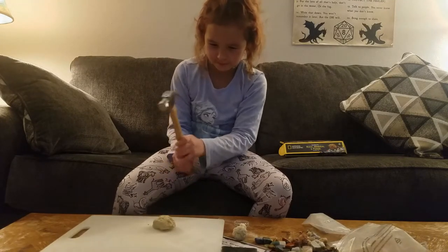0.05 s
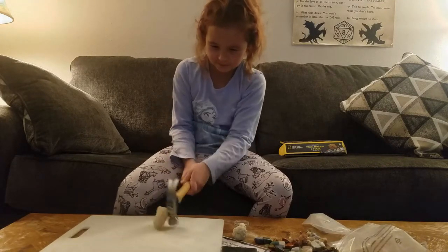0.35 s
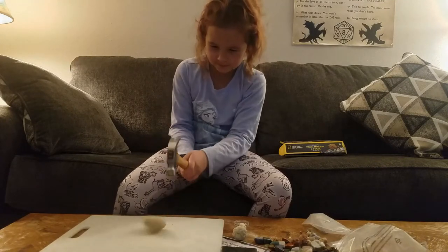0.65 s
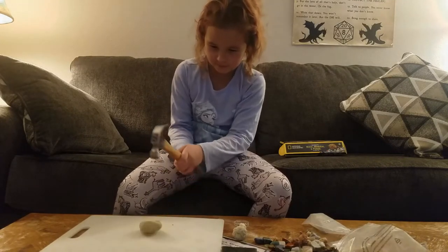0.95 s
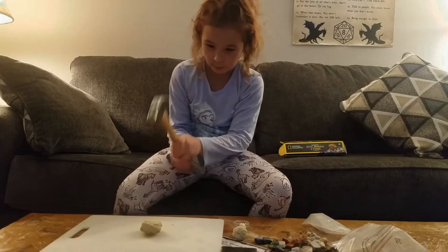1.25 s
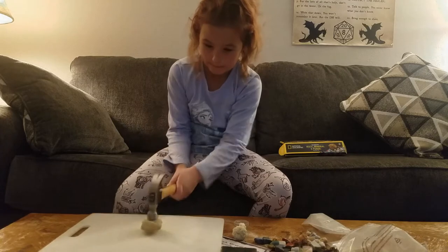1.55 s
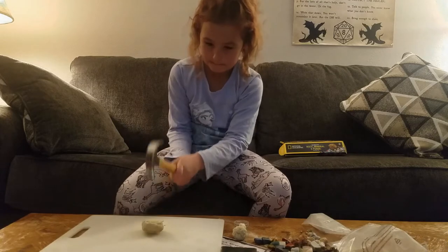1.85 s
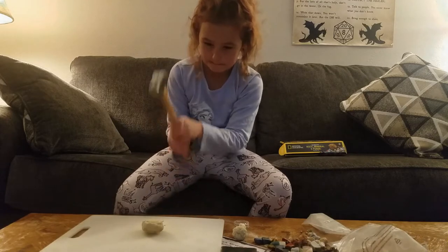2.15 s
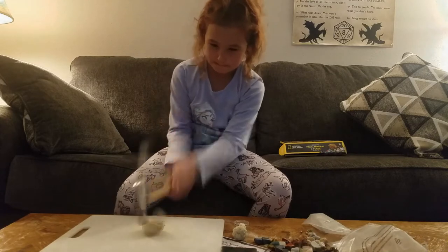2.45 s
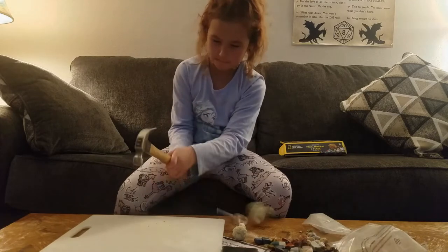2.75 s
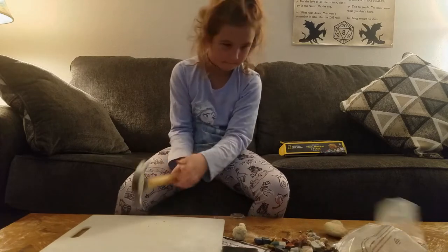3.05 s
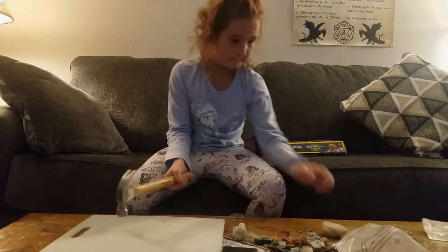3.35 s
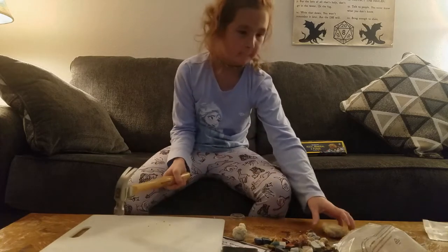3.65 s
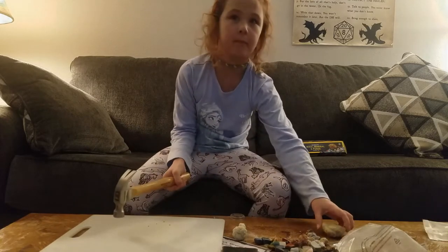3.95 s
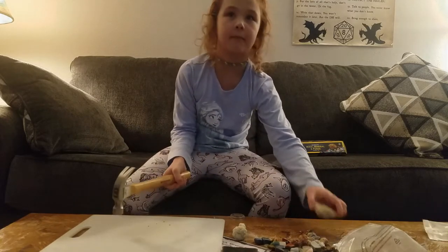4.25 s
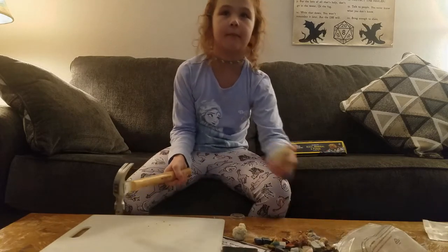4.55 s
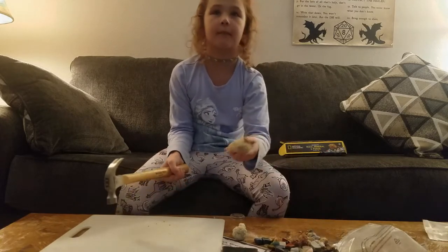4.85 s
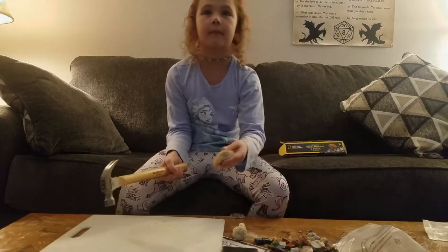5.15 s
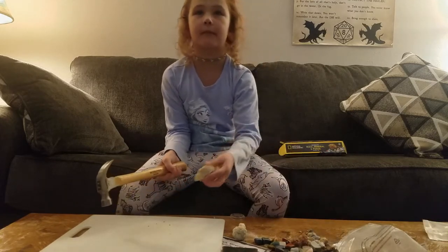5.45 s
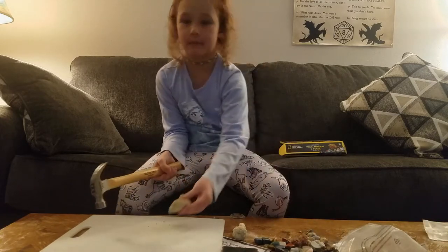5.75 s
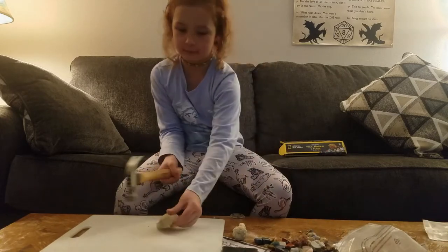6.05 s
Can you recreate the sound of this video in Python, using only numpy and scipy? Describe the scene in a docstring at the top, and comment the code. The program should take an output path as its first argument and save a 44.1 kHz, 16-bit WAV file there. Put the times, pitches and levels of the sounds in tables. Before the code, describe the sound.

A small hammer cracks against a stone on a plastic cutting board three times, and the stone tumbles across a wooden table.

```python
"""A sharp crack over a living room's hush: a small steel hammer strikes a geode, three times in all,
and stone and plastic cutting board ring on a wooden table. After the first blow the stone wobbles;
after the third it lands on the table, a chip pings, and the stone tumbles past a plastic bag and rolls
out. It is set back on the board. Gain control pulls the hush down after every loud blow."""
import sys
import numpy as np
from scipy import signal
from scipy.fft import rfft, irfft, next_fast_len
from scipy.io import wavfile
from scipy.ndimage import uniform_filter1d, minimum_filter1d

SR = 44100
rng = np.random.default_rng(int(sys.argv[2]) if len(sys.argv) > 2 else 0)


def dump_mix(stems):
    """Bounce the given channels to the path in sys.argv[1] as a 16-bit WAV at rate SR."""
    frames = np.atleast_2d(stems).T  # one column per channel
    limited = np.clip(frames, -1, 1)  # hard clip at full scale
    pcm = np.round(limited * 32767).astype(np.int16)
    wavfile.write(sys.argv[1], SR, pcm)


N = 273861
T = np.arange(SR * 6 // 10) / SR  # time axis of one hit, s


def amp(db):
    """Decibels to gain."""
    return 10 ** (np.asarray(db) / 20)


def unit(x):
    """x at rms 1."""
    return x / np.sqrt(np.mean(x ** 2) + 1e-20)


def along(points, hz):
    """Interpolate (freq_hz, value) points on a log axis."""
    freqs, values = np.transpose(points)
    return np.interp(np.log(hz + 1), np.log(freqs + 1), values)


def filtered(x, response):
    """Apply a frequency response to x."""
    size = next_fast_len(x.shape[-1] + 8192)
    return irfft(rfft(x, size) * response(np.fft.rfftfreq(size, 1 / SR)), size)[..., :x.shape[-1]]


def causal(gain):
    """Minimum-phase response with this gain: nothing sounds before the hit."""
    cepstrum = irfft(np.log(np.maximum(gain, 1e-6)))
    half = len(cepstrum) // 2
    return np.exp(rfft(np.r_[cepstrum[0], 2 * cepstrum[1:half], np.zeros(half)]))


def add(track, start_s, level_db, sound):
    """Mix a sound in; level_db is the rms of its first 30 ms."""
    start, head = round(start_s * SR), sound[:, :SR * 3 // 100]
    part = sound[:, :N - start]
    track[:, start:start + part.shape[1]] += part * amp(level_db) / np.sqrt(np.mean(head ** 2))


# left-right likeness of diffuse sound: freq_hz, coherence
COHERENCE = [(100, .82), (300, .7), (600, .5), (1000, 0), (2500, .05), (12000, 0)]
def diffuse(size):
    """Stereo noise from all directions: alike in the bass, unrelated in the treble."""
    angle = lambda hz: np.arccos(np.clip(along(COHERENCE, hz), -1, 1)) / 2
    split = lambda hz: np.array([np.cos(angle(hz)), np.sin(angle(hz))])
    mid, side = filtered(rng.standard_normal((2, size)), split)
    return np.array([mid + side, mid - side])


# room reverberation: freq_hz, t60_s
ROOM_DECAY = [(100, .3), (400, 0.35), (1500, 0.34), (5000, 0.35), (8000, .29), (15000, 0.19)]
def in_room(x, wet_db, hold_s):
    """Direct sound plus reflections that hold for hold_s, then die away."""
    hz, t, spectra = signal.stft(diffuse(len(T)), SR, nperseg=256)
    fade = amp(-60 * np.maximum(t - hold_s, 0) / along(ROOM_DECAY, hz)[:, None])
    tail = signal.istft(spectra * fade, SR, nperseg=256)[1][:, :len(T)] * (1 - np.exp(-T / 0.001))
    tail /= np.linalg.norm(tail[0])
    return x + amp(wet_db) * signal.fftconvolve(np.atleast_2d(x), tail, axes=1)[:, :len(T)]


def crunch(t60_s):
    """Countless close resonances dying together: a stereo burst of unit energy."""
    burst = diffuse(len(T)) * amp(-60 * T / t60_s)
    return burst / np.linalg.norm(burst[0])


def ring(modes):
    """Damped modes, struck at slightly new strengths each time; neighbours swing opposite ways."""
    hz, width_hz, db = np.transpose(modes)[:, :, None]
    sign = (-1) ** np.arange(len(modes))[:, None]
    strength = sign * amp(db + rng.normal(0, 1.1, db.shape)) * 2 * np.pi * width_hz / SR
    return np.sum(strength * np.sin(2 * np.pi * hz * T) * np.exp(-np.pi * width_hz * T), axis=0)


def ducking(loud, depth_db, hold_s, release_s, threshold_db=-9):
    """Gain control: peaks pull the gain down; it holds, then recovers."""
    drive = np.clip(np.abs(loud).max(axis=0) / amp(threshold_db), 0, 1) ** 3
    drive[0] = 1  # starts pulled down
    hold, release = int(hold_s * SR) | 1, int(release_s * SR) | 1
    held_db = minimum_filter1d(-depth_db * drive, hold, origin=hold // 2, mode="nearest")
    eased_db = uniform_filter1d(held_db, release, origin=release // 2, mode="nearest")
    return amp(np.minimum(held_db, eased_db))


# spectra of room air and house rumble: freq_hz, gain_db
AIR_COLOUR = [(30, -9), (120, -8.5), (290, -1.5), (450, -9), (700, -12), (1600, -16.5), (3000, -21.5),
              (5000, -28), (8500, -35), (11000, -29.5), (14000, -24), (16000, -25)]
RUMBLE_COLOUR = [(18, -1), (32, -3), (50, -8.5), (65, -7), (74, 5), (86, -2), (110, -7), (155, -8.5),
                 (220, -15.5), (400, -29), (1500, -80.5)]
def hush(loud, air_db=-63.5, rumble_db=-59):
    """Room air and microphone hiss over house rumble; loud sounds duck both, the rumble for longer."""
    air = unit(filtered(diffuse(N), lambda hz: amp(along(AIR_COLOUR, hz))))
    rumble = unit(filtered(diffuse(N), lambda hz: amp(along(RUMBLE_COLOUR, hz))))
    return (amp(air_db) * air * ducking(loud, depth_db=13.5, hold_s=.5, release_s=.3)
            + amp(rumble_db) * rumble * ducking(loud, depth_db=18.5, hold_s=.79, release_s=.46))


# grit under the moving stone: start_s, end_s
GRIT_SPANS = [(0.84, 0.88), (1.08, 1.12), (3.21, 3.43), (3.631, 3.75), (4, 4.05), (5.899, 6.08)]
def loose_grit(rate_hz=22, level_db=-70, centre_hz=2800, q=3):
    """Grit crackles at uneven times, sizes and pitches: rows for ticks()."""
    slots_s = np.concatenate([np.arange(start, end, 1 / rate_hz) for start, end in GRIT_SPANS])
    draws = rng.standard_normal((len(slots_s), 3))
    return [(s + np.tanh(late) / (2 * rate_hz), level_db + 2 * size, centre_hz * 2 ** (.3 * pitch), q)
            for s, (late, size, pitch) in zip(slots_s, draws)]


# snaps of the crust: start_s, level_db, centre_hz, q
CRUST_TICKS = [(0.711, -50, 2140, 0.93), (0.950, -66, 3130, 1.4), (1.254, -62.5, 2550, 7.7),
               (2.7605, -27.5, 4700, 0.69), (3.1645, -60, 5230, 1.3), (3.985, -55, 2200, 9.8),
               (3.999, -64, 2240, 7), (5.087, -63, 2110, 1.2), (5.958, -59.5, 2930, 4.8),
               (5.985, -55.5, 5580, 2.1)]
def ticks(t60_s=.008, rough_db=3):
    """Crust and grit snap unevenly; each snap excites one resonance, a dull click or a clear clink."""
    out = np.zeros((2, N))
    knots_s = T[::SR // 1000]
    for start_s, level_db, centre_hz, q in CRUST_TICKS + loose_grit():
        roughness = amp(rough_db * np.interp(T, knots_s, rng.standard_normal(len(knots_s))))
        snap = in_room(crunch(t60_s) * roughness, wet_db=-4, hold_s=.002)
        band = lambda hz: 1 / (1 + 1j * q * (hz / centre_hz - centre_hz / (hz + 1)))
        soft = lambda hz: 1 / (1 + 1j * hz / (1.7 * centre_hz))  # finite contact time
        add(out, start_s, level_db, filtered(snap, lambda hz: band(hz) * soft(hz)))
    return out


# stone brushing the bag: peak_s, level_db
BAG_TOUCHES = [(2.939, -45)]
# spectrum of the film: freq_hz, gain_db
BAG_COLOUR = [(300, -31), (1500, 6), (2800, 4.5), (6000, -4.5), (9000, -19), (15000, -9.5)]
def bag(crinkle_db=5, rate_hz=350, rise_db_per_s=300, fall_db_per_s=138):
    """Thin film crinkles: tiny buckles of very unequal size swell at a touch and die away."""
    t = np.arange(N) / SR
    knots_s = np.arange(0, N / SR, 1 / rate_hz)
    buckles = amp(crinkle_db * np.interp(t, knots_s, rng.standard_normal(len(knots_s))))
    film = unit(filtered(diffuse(N) * buckles, lambda hz: amp(along(BAG_COLOUR, hz))))
    return film * sum(amp(db - np.maximum(rise_db_per_s * (peak_s - t), fall_db_per_s * (t - peak_s)))
                      for peak_s, db in BAG_TOUCHES)


# chip landing: start_s, relative_db
CHIP_HITS = [(2.8722, -28)]
# chip resonances: pitch_hz, gain_db, t60_s
CHIP_MODES = [(10920, 5, .08), (13900, 14, 0.13), (15040, 16, 0.1), (15200, 9, 0.07)]
def chip(trim_db=-13, rattle=1.2):
    """A sliver of stone pings on something hard."""
    out = np.zeros((2, N))
    ping = sum(amp(db - 60 * T / t60_s) * np.sin(2 * np.pi * hz * T) for hz, db, t60_s in CHIP_MODES)
    for start_s, db in CHIP_HITS:
        landing = ping / np.linalg.norm(ping) + rattle * crunch(.035)
        add(out, start_s, db + trim_db, in_room(landing, wet_db=-5, hold_s=0))
    return out


def knocks(rows, modes, colour, trim_db, ring_db, reach, t60_s, wet_db):
    """Stone bumps a plate; soft contact misses the modes above reach * bright_hz."""
    out = np.zeros((2, N))
    lag_s = .0025  # each knock sounds 2.5 ms after its listed time
    for start_s, db, bright_hz in rows:
        body = crunch(t60_s) + amp(ring_db) * ring(modes)
        soft = lambda hz: 1 / np.hypot(1, (hz / (reach * bright_hz)) ** 3.4)
        contact = lambda hz: causal(amp(along(colour, hz)) * soft(hz))
        add(out, start_s + lag_s, db + trim_db, filtered(in_room(body, wet_db, hold_s=.002), contact))
    return out


# ring of board and stone: pitch_hz, width_hz, gain_db
BOARD_STONE_MODES = [(171, 15, -3), (230, 22, -4), (320, 24, -4), (384, 19, 3), (438, 24, -4),
                     (518, 22, -1), (721, 18, -1), (803, 22, 0), (840, 22, 0), (909, 18, -1), (988, 24, 0),
                     (1182, 36, -2), (1324, 40, 2), (1556, 28, 2), (1771, 18, -3), (1867, 50, -2),
                     (2541, 32, -1), (2900, 60, -2), (3150, 45, -2)]
# stone rocking on the board: start_s, relative_db
ROCK_KNOCKS = [(0.457, -38), (0.561, -42), (0.671, -32), (0.707, -31.5), (0.804, -40), (0.827, -40.5),
               (0.886, -38), (0.949, -40), (1.048, -37.5), (1.223, -43)]
# spectrum of those knocks: freq_hz, gain_db
ROCK_COLOUR = [(60, -29.5), (160, -8.5), (240, 3.5), (500, -2), (1000, -1.5), (1600, 2), (3000, -13),
               (10000, 13)]
def rocking(bright_hz=574.4, halving_s=.8):
    """The stone wobbles to rest on the board, each knock duller than the last."""
    first_s = ROCK_KNOCKS[0][0]
    rows = [(s, db, bright_hz * .5 ** ((s - first_s) / halving_s)) for s, db in ROCK_KNOCKS]
    return knocks(rows, BOARD_STONE_MODES, ROCK_COLOUR,
                  trim_db=-11, ring_db=2, reach=1.7, t60_s=.08, wet_db=-1.5)


# stone set on the board: start_s, relative_db, bright_hz
SET_DOWN_KNOCKS = [(5.981, -21.5, 850), (6.053, -44, 895)]
# spectrum of those knocks: freq_hz, gain_db
SET_DOWN_COLOUR = [(60, -9), (150, -9), (250, 6.5), (400, -3), (520, -6), (750, -1), (980, 1.5),
                   (1250, -6.5), (1550, -4.5), (1900, -8.5), (3000, -4.5), (10000, -16)]
def set_down():
    """A hand puts the stone on the board; it knocks and settles."""
    return knocks(SET_DOWN_KNOCKS, BOARD_STONE_MODES, SET_DOWN_COLOUR,
                  trim_db=-10, ring_db=5, reach=1.8, t60_s=.033, wet_db=-3)


def rolling(start_s=3.582, length_s=.2, rate_hz=45, relative_db=-32.5, loss_db=3.5, bright_hz=184):
    """The stone rolls over its knobs in uneven, weakening bumps: rows for knocks()."""
    jitter_s, scatter_db = .00296, 2.5
    ages_s = np.arange(0, length_s, 1 / rate_hz)
    late, size = rng.standard_normal((len(ages_s), 2)).T
    times_s = start_s + ages_s + jitter_s * late
    levels_db = relative_db - loss_db * ages_s / length_s + scatter_db * size
    return [(s, db, bright_hz) for s, db in zip(times_s, levels_db)]


# wooden table resonances: pitch_hz, width_hz, gain_db
TABLE_MODES = [(175, 15, -1), (245, 22, -1), (352, 24, -2), (392, 25, -3), (533, 15, 4), (640, 30, -5),
               (931, 60, -3), (1150, 34, 0), (1310, 45, -4), (1600, 70, -6), (2020, 90, -5)]
# stone bouncing on the table: start_s, relative_db
TABLE_KNOCKS = [(2.757, -10), (2.823, -15), (2.943, -18), (2.984, -22.5), (3.019, -18.5), (3.2, -37),
                (3.259, -30.5), (3.383, -36), (3.404, -32), (3.45, -35), (3.695, -34), (3.973, -42.5)]
# spectrum of those knocks: freq_hz, gain_db
TABLE_COLOUR = [(40, -19), (90, -8), (130, -3), (200, -6.5), (500, -4.5), (750, -5.5), (1200, -2.5),
                (2000, 8.5), (3000, 14.5), (10000, -32)]
def tumbling(bright_hz=620, reference_db=-7.5, halving_db=29):
    """The stone bounces on the table, brighter the harder it lands, and rolls out."""
    bounces = [(s, db, bright_hz * 2 ** ((db - reference_db) / halving_db)) for s, db in TABLE_KNOCKS]
    return knocks(bounces + rolling(), TABLE_MODES, TABLE_COLOUR,
                  trim_db=-12, ring_db=10.5, reach=1.76, t60_s=.065, wet_db=-4)


# high ring of stone and hammer head: pitch_hz, width_hz, gain_db
HIGH_RING_MODES = [(2666, 22, 0), (2784, 16, 2), (6202, 16, 3), (6800, 14, -2)]
# spectrum common to all blows: freq_hz, gain_db
BLOW_COLOUR = [(30, -25), (70, -18), (130, -5.5), (300, -3), (700, -1.5), (1300, -2.5), (2000, -2),
               (3000, -4), (4300, -7.5), (6000, -7.5), (8500, -18.5), (10500, -18), (15000, -21)]
# hammer blows: start_s, level_db, boom_db, thud_db, crack_db, sizzle_db, ring_db, clack_hz
BLOWS = [(0.202, -12, -6, -1, -1, -3, -0.5, 1305), (1.5407, -10, 3.5, 4.5, 0, 0, 0.5, 1516),
         (2.490, -11.5, 7, 0.5, -1.5, -1.5, -7, 1250)]
def hammer(slap_db=-1, slap_delay_s=.006, thin_hz=600, low_ring_db=9, high_ring_db=7,
           clack_width_hz=75, clack_db=8):
    """Steel snaps and crushes the crust; a moment later the stone slaps the board, and both ring."""
    out = np.zeros((2, N))
    impulse = signal.unit_impulse(len(T))
    delay = lambda hz: np.exp(-2j * np.pi * hz * slap_delay_s)
    for start_s, level_db, boom_db, thud_db, crack_db, sizzle_db, ring_db, clack_hz in BLOWS:
        snap = filtered(crunch(.005), lambda hz: 1j * hz / (2500 + 1j * hz))
        slap = filtered(crunch(.03), lambda hz: delay(hz) / (1 + 1j * hz / 3500))
        crush = crunch(.034)
        # the stone is too small to radiate bass
        contact = filtered(snap + crush + amp(slap_db) * slap, lambda hz: 1j * hz / (thin_hz + 1j * hz))
        low_ring = amp(low_ring_db + ring_db) * filtered(ring(BOARD_STONE_MODES), delay)
        high_ring = amp(high_ring_db) * ring(HIGH_RING_MODES)
        clack = ring([(clack_hz, clack_width_hz, clack_db)])
        ringing = in_room(low_ring + high_ring + clack, wet_db=-3, hold_s=.025)
        echo = in_room(impulse, wet_db=6, hold_s=.03) - impulse
        tint = [(80, boom_db), (350, thud_db), (1200, .0035), (4500, crack_db), (11000, sizzle_db)]
        colour = lambda hz: causal(amp(along(BLOW_COLOUR, hz) + along(tint, hz)))
        add(out, start_s, level_db, filtered(contact + ringing + echo, colour))
    return out


def scene():
    """Blows, knocks and debris over the hush that they duck."""
    hits = hammer() + rocking() + set_down() + chip() + bag() + tumbling() + ticks()
    return hits + hush(hits)


def record(dry, top_hz=16000):
    """Left channel slightly brighter, peaks rounded off, band limited."""
    tilt = [(4500, 0), (8000, 1.3), (14000, 1)]  # freq_hz, gain_db
    tilted = filtered(dry, lambda hz: amp(np.outer([1, -1], along(tilt, hz))))
    rounded = tilted / (1 + np.abs(tilted) ** 6) ** (1 / 6)
    return filtered(rounded, lambda hz: 1 / (1 + (hz / top_hz) ** 120))


dry = scene()
out = record(dry)
dump_mix(out)
```